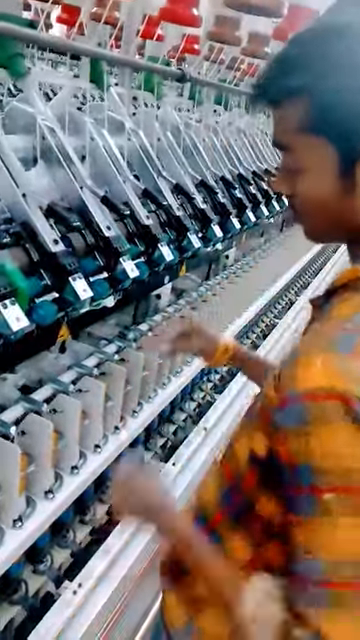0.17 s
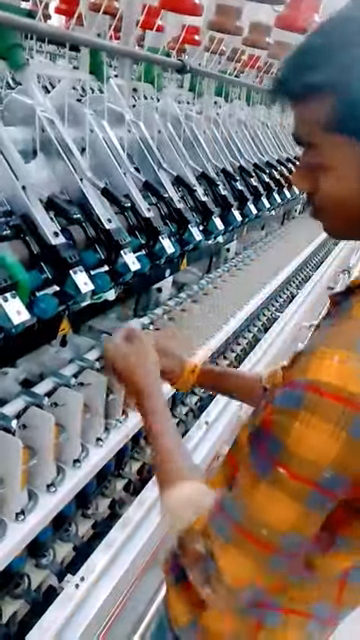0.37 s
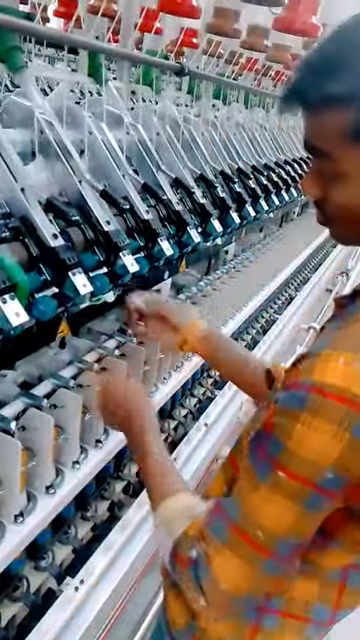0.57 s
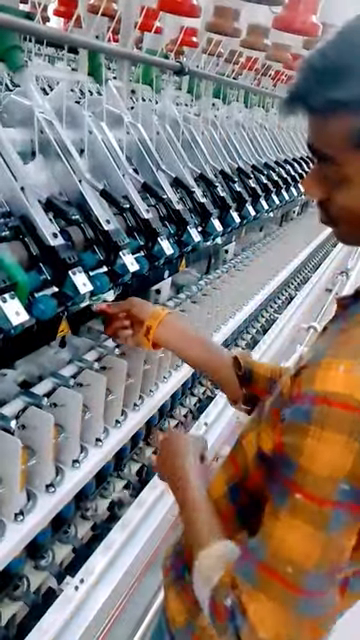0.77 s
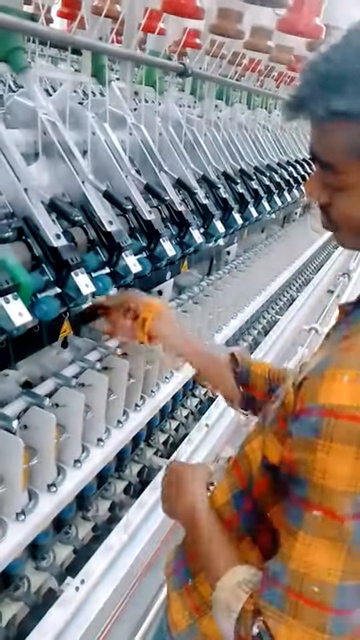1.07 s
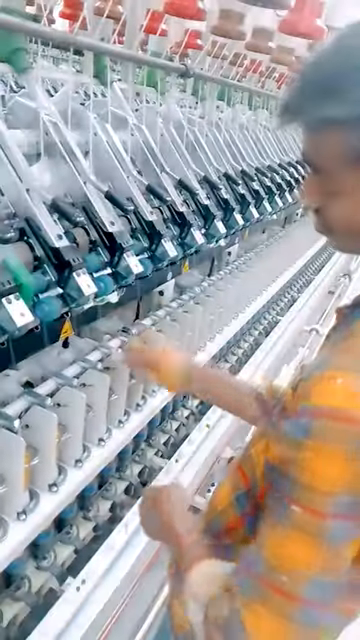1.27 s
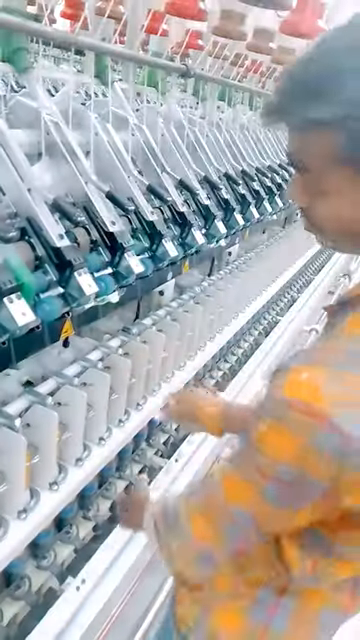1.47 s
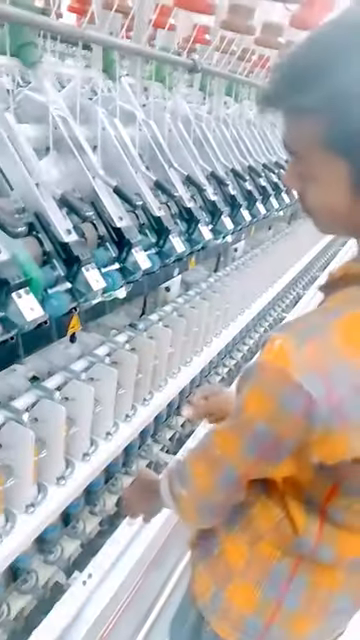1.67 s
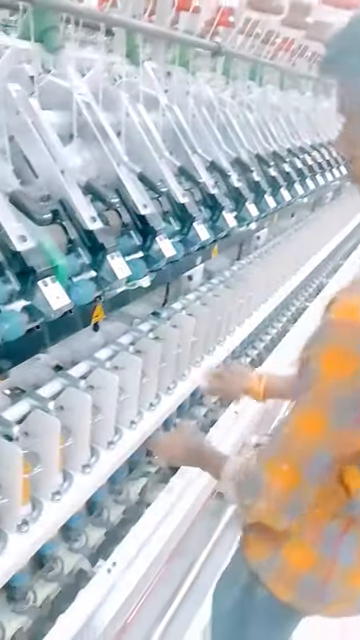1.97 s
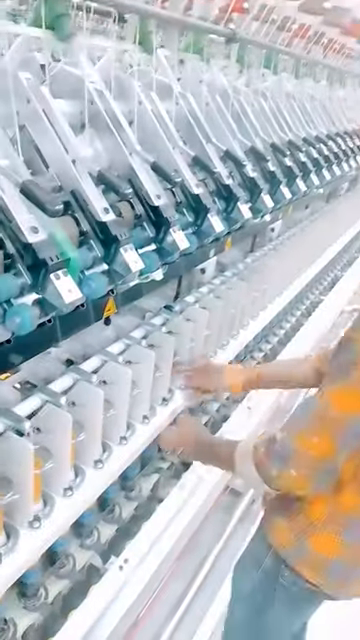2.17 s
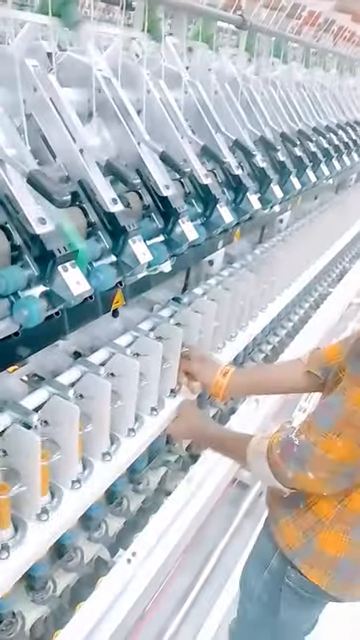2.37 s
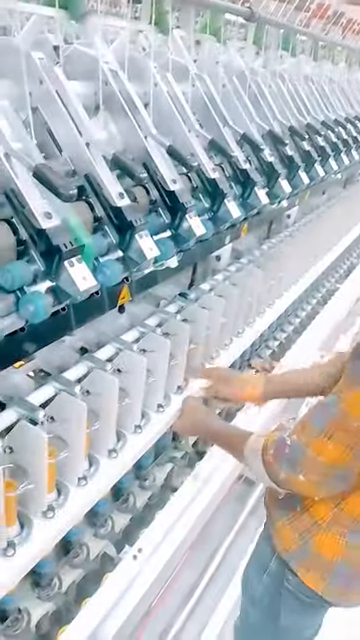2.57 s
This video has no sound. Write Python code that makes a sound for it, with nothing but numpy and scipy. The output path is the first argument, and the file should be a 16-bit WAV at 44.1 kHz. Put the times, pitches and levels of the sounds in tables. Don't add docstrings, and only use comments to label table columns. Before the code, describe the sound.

Loud unbroken roar of a yarn spinning frame fills a mill hall from 0 to 2.7 seconds. Spindles hum near 305 hertz, strongest around 1.3-2.1, against slightly lower beating hums from neighbouring frames. A belt whine near 1.1 kilohertz swells around 0.2, 1.1, 1.7 and 2.2. Rapid ticks blur into a thin buzz and faint high whistle. Close phone microphone, thin bass, limited peaks, slightly patchy treble.

```python
import sys
import numpy as np
from scipy import signal
from scipy.fft import rfft, irfft, next_fast_len
from scipy.io import wavfile
from scipy.ndimage import uniform_filter1d

SR = 44100
rng = np.random.default_rng(int(sys.argv[2]) if len(sys.argv) > 2 else 0)


def dump(signal):
    limited = np.clip(np.atleast_2d(signal).T, -1, 1)
    pcm = np.round(limited * 32767).astype(np.int16)
    wavfile.write(sys.argv[1], SR, pcm)


def gain_from_decibels(decibels):
    exponent = np.asarray(decibels, float) / 20
    return 10 ** exponent


N = 120393
T = np.arange(N) / SR
M = next_fast_len(N)
F = np.arange(1, M // 2 + 2) * SR / M
SWELL_DB = 2.5


def level(x, db):
    return x * gain_from_decibels(db) / np.sqrt(np.mean(x ** 2))


def shaped(x, gain):
    return irfft(rfft(x, M) * gain, M)[..., :N]


def colour(x, points, peaks=()):
    hz_points, db_points = np.array(points, float).T
    db = np.interp(np.log(F), np.log(hz_points), db_points)
    below = np.maximum(hz_points[0] / F, 1)
    above = np.maximum(F / hz_points[-1], 1)
    db = db - 40 * np.log2(below * above)
    for hz, width, peak_db in peaks:
        db = db + peak_db / (1 + (2 * (F - hz) / width) ** 2)
    return shaped(x, gain_from_decibels(db))


def walk(rate_hz):
    hold = int(SR / rate_hz)
    steps = np.repeat(rng.standard_normal(N // 100), hold)[:N]
    smooth = uniform_filter1d(uniform_filter1d(steps, hold), hold)
    return (smooth - smooth.mean()) / smooth.std()


def flicker(rate_hz):
    quick = walk(rate_hz)
    quick = quick - uniform_filter1d(quick, int(SR * .11))
    return quick / quick.std()


def curve(rows):
    times, values = np.array(rows).T
    return np.interp(T, times, values)


def tone(hz, db, wobble, swell_db):
    turns = np.cumsum(hz * (1 + wobble * walk(5))) / SR + rng.random()
    loudness = gain_from_decibels(db + swell_db * walk(3.87))
    return np.sqrt(2) * loudness * np.sin(2 * np.pi * turns)


def banded(x, lo_hz, hi_hz, shared_db):
    neighbour_db, own_db = .35, .6
    octaves = np.log2(F)
    out, last = 0, flicker(18)
    for centre in np.arange(np.log2(lo_hz), np.log2(hi_hz), 1 / 3):
        new = flicker(18)
        share = np.cos(np.pi / 2 * np.clip(3 * (octaves - centre), -1, 1)) ** 2
        swell_db = shared_db + neighbour_db * (last + new) + own_db * flicker(24.9)
        out = out + shaped(x, share) * gain_from_decibels(swell_db)
        last = new
    return out


def hall_roar():
    # hz, density_db [dB per Hz]
    roar_colour = [(190, -23), (330, -4), (383, -6.5), (652, -8.5), (1100, -7.5), (1290, -6.5),
                   (1660, -1.5), (3990, -6), (5200, -22), (6760, -30), (11400, -120)]
    # centre_hz, width_hz, gain_db
    body_peaks = [(1092, 50, 5), (1390, 70, 3), (670, 90, -3), (3250, 200, 1.5), (4100, 400, 3),
                  (278, 30, 5), (555, 50, 3)]
    # hz, density_db [dB per Hz]
    hiss_colour = [(4000, -15), (4800, -6), (6200, -2.5), (6920, -9), (7890, -11), (9880, -11),
                   (12400, -14), (14300, -12), (15500, -8.5)]
    # hz, density_db [dB per Hz]
    rumble_colour = [(20, -17), (70, -19), (90, -18.5), (135, -21), (175, -11.5), (230, -2.5), (330, -2.5),
                     (420, -44)]
    common_db = .35 * flicker(39.93) + .7 * flicker(90)
    body = banded(colour(rng.standard_normal(N), roar_colour, body_peaks), 192, 9000, common_db)
    hiss_db = common_db + .8 * flicker(40)
    hiss = banded(colour(rng.standard_normal(N), hiss_colour), 3200, 21000, hiss_db)
    rumble = colour(rng.standard_normal(N), rumble_colour)
    return level(body, -11.5) + level(hiss, -30) + level(rumble, -32.5)


def drive_whines():
    # pitch_hz, level_db
    whines = [(1658, -32), (781, -40), (229, -42), (4017, -38), (2143, -33), (449, -39), (2302, -37)]
    return sum(tone(hz, db, 0.00074, SWELL_DB) for hz, db in whines)


def belt_whine():
    # time_s, level_db
    belt_load = [(0.0, -36), (0.03, -48), (0.19, -26.5), (1.09, -33), (1.13, -20), (1.41, -31), (1.44, -30),
                 (1.71, -39), (1.73, -24), (2.08, -40), (2.23, -19.5), (2.27, -30), (2.68, -29),
                 (2.73, -33)]
    return tone(1089, curve(belt_load) - 1.5, 0.00318, 2.4)


def neighbour_frames():
    # spindle_hz, level_db, overtones_db
    frames_near_by = [(270.2, -32, -39.5), (275.1, -27.5, -39.5), (280.45, -27, -35.5), (285, -28, -38)]
    # multiple [of spindle pitch], level_db [added to overtones_db]
    frame_overtones = [(2, -1.5), (3, 0), (4, 2), (5, -2), (6, -17), (7, -2.5)]
    out = 0
    for hz, db, over_db in frames_near_by:
        out = out + tone(hz, db, 0.0019, SWELL_DB)
        out = out + sum(tone(k * hz, over_db + d, .0012, SWELL_DB) for k, d in frame_overtones)
    return out


def travellers(count=8, order=55):
    # time_s, speed_hz [turns a second]
    speed = [
        (0, 299),
        (1.4, 300.9),
        (2.73, 300),
    ]
    # hz, gain_db
    tick_colour = [(4500, -14), (5700, 3), (7200, -6.5), (9000, -9), (11500, -16), (13000, -8), (14400, -2),
                   (15500, -4)]
    # time_s, level_db
    whistle = [
        (0.0, -48),
        (0.2, -44),
        (0.92, -49),
        (2.34, -45),
        (2.37, -49),
        (2.57, -43),
        (2.65, -48),
        (2.73, -42),
    ]
    ring_hz, ring_width_hz = 14435, 120
    ticks = 0
    for _ in range(count):
        own_speed = curve(speed) * (1 + .0015 * walk(6))
        half_turn = np.pi * (np.cumsum(own_speed) / SR + rng.random())
        pulses = np.sin((2 * order + 1) * half_turn) / (np.sin(half_turn) + 1e-9)
        ticks = ticks + gain_from_decibels(2.8 * walk(8.7)) * pulses
    ring_band = [(ring_hz - ring_width_hz, 0), (ring_hz + ring_width_hz, 0)]
    ring = colour(ticks, ring_band, [(ring_hz, ring_width_hz, 40)])
    return level(colour(ticks, tick_colour), -38) + level(ring, -2.5) * gain_from_decibels(curve(whistle))


def near_spindles():
    # time_s, level_db
    near_hum = [(0.0, -30), (0.13, -21), (0.36, -36), (0.38, -24), (0.88, -19.5), (1.27, -18), (1.3, -23),
                (1.44, -15), (1.5, -21.5), (2.06, -15.5), (2.35, -23.5), (2.45, -32), (2.58, -23),
                (2.73, -27)]
    # multiple [of spindle pitch], level_db
    near_overtones = [(2, -37), (3, -37), (4, -34), (5, -31), (6, -31), (7, -37), (8, -36), (9, -39),
                      (10, -39)]
    spindle_hz = 305.5
    hum = tone(spindle_hz, curve(near_hum), .0012, 0.9)
    return hum + sum(tone(k * spindle_hz, db, 0.00066, SWELL_DB) for k, db in near_overtones)


def scene():
    background = hall_roar() + drive_whines() + belt_whine() + neighbour_frames()
    return np.tile(background + travellers() + near_spindles(), (2, 1))


def emptied(x):
    # middle_s, band_number, length_s
    dropouts = [(.029, 17, .023), (.215, 17, .023), (.337, 17, .023), (.406, 17, .023), (.917, 17, .023),
                (1.341, 17, .046), (1.457, 17, .093), (1.782, 17, .046), (2.061, 17, .046),
                (2.473, 17, .023), (2.595, 17, .046), (.075, 18, .023), (.151, 18, .023), (.505, 18, .093),
                (.691, 18, .046), (.877, 18, .046), (1.033, 18, .023), (1.115, 18, .046), (1.283, 18, .023),
                (1.596, 18, .046), (1.736, 18, .046), (1.863, 18, .023), (2.339, 18, .046),
                (2.403, 18, .023), (.168, 19, .023), (.238, 19, .023), (.737, 19, .046), (2.026, 19, .023),
                (2.374, 19, .023), (2.566, 16, .023)]
    band_hz, fade_s = SR / 64, 1024 / SR
    out = x
    for band in range(16, 20):
        gate = 0
        for middle, number, length in dropouts:
            if number == band:
                rise = np.clip(.5 + (length / 2 - abs(T - middle)) / fade_s, 0, 1)
                gate = gate + np.sin(np.pi / 2 * rise) ** 2
        out = out - gate * shaped(x, (F > band * band_hz) & (F < (band + 1) * band_hz))
    return out


def parted():
    # middle_s, low_hz, high_hz, half_length_s, level_db
    patches = [(.158, 5600, 8300, .03, -35), (.6, 12400, 13900, .03, -47), (.715, 4100, 5300, .03, -32),
               (.715, 7600, 9000, .03, -45), (1.04, 4100, 5300, .03, -28), (2.294, 13100, 14500, .03, -45),
               (2.34, 8300, 9700, .03, -43), (2.34, 10300, 11800, .03, -45), (2.456, 4700, 6400, .03, -35),
               (2.456, 8300, 11100, .03, -42), (2.503, 4700, 5800, .03, -34)]
    out = 0
    for middle, lo, hi, length, db in patches:
        band = shaped(rng.standard_normal(N), (F > lo) & (F < hi))
        fade = np.cos(np.pi / 2 * np.clip((T - middle) / length, -1, 1)) ** 3
        out = out + level(band, db) * fade
    return out * np.array([[1], [-1]])


def band_limit(x):
    return signal.sosfilt(signal.butter(12, 16660, fs=SR, output="sos"), x)


def record(dry):
    ceiling, top_hz = 1.13, 15504
    limited = dry / (1 + np.abs(dry / ceiling) ** 4.3) ** (1 / 3.2)
    top_cut = signal.ellip(12, .1, 60, top_hz - 30, fs=SR, output="sos")
    mix = emptied(signal.sosfiltfilt(top_cut, limited)) + parted()
    return band_limit(mix)


dry = scene()
out = record(dry)
dump(out)
```